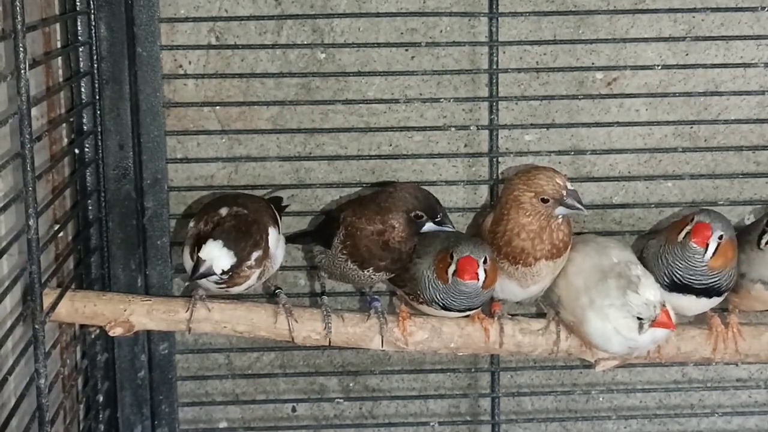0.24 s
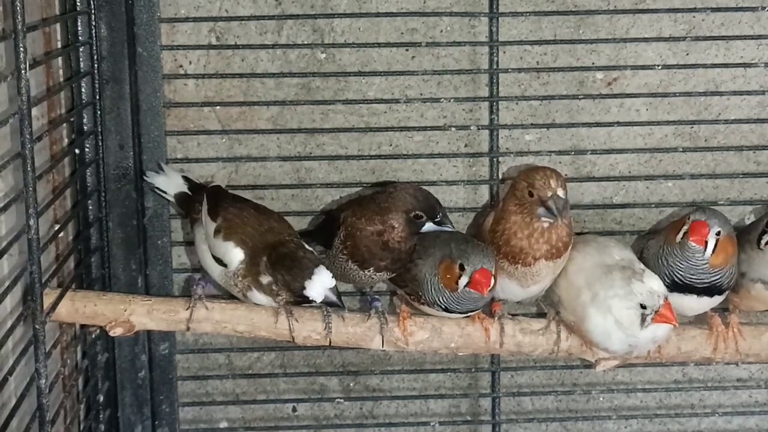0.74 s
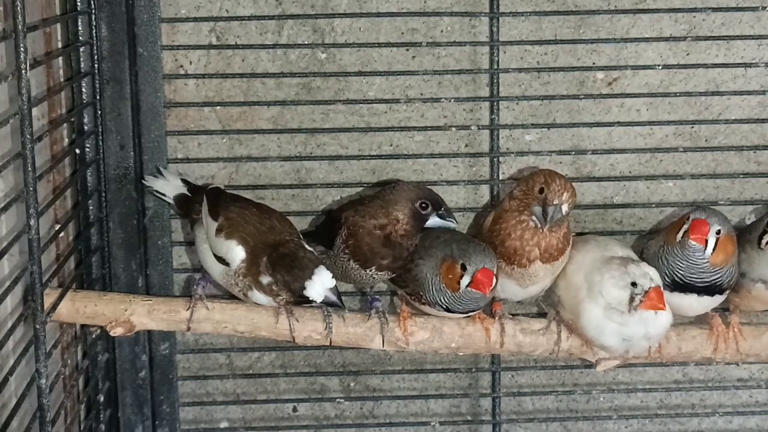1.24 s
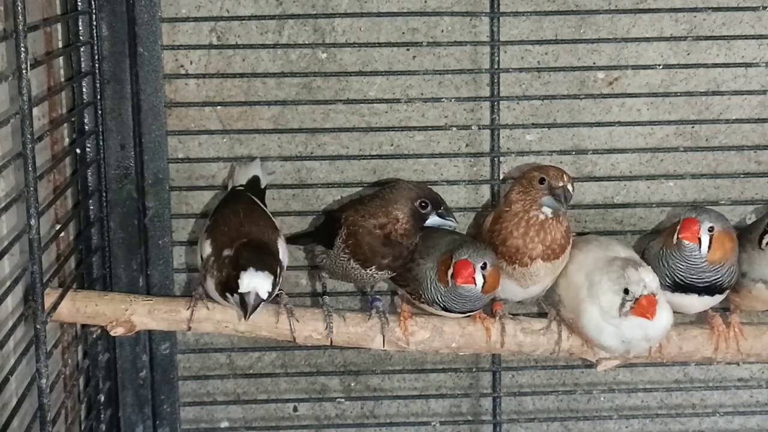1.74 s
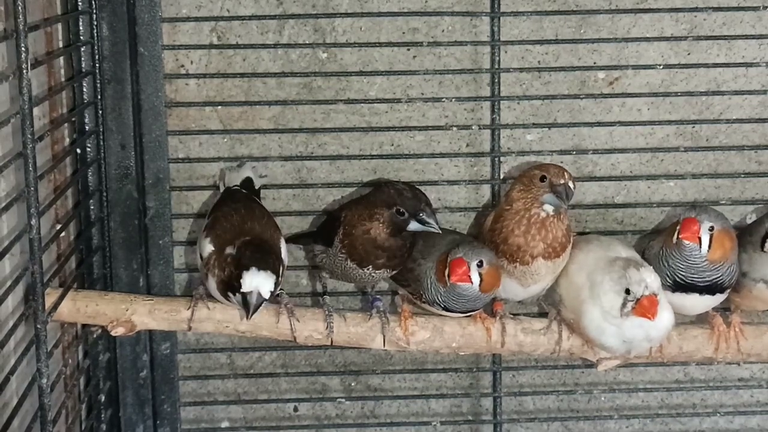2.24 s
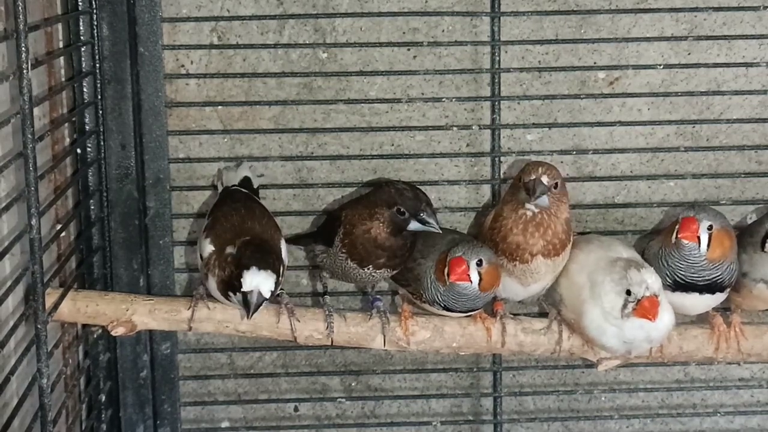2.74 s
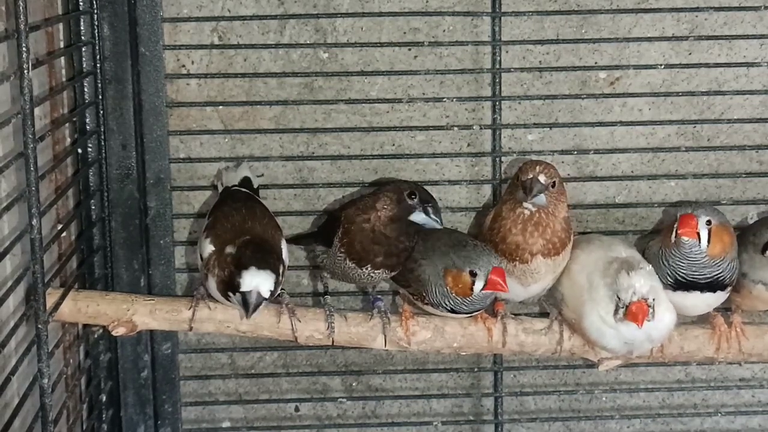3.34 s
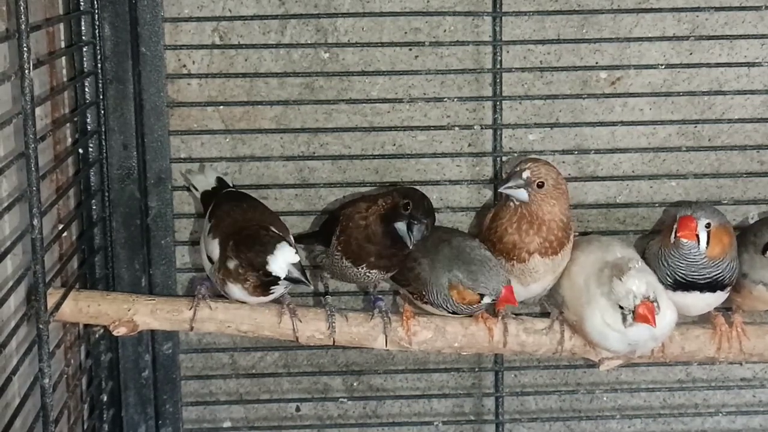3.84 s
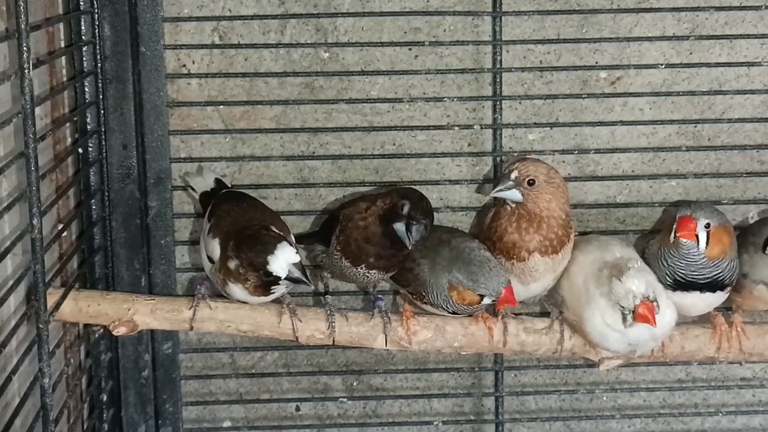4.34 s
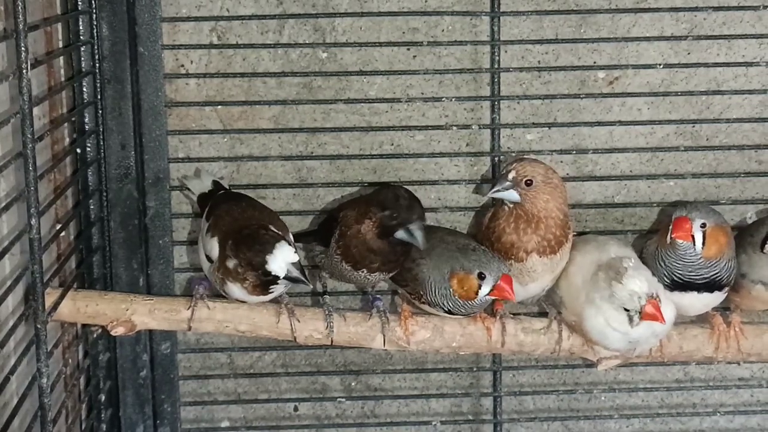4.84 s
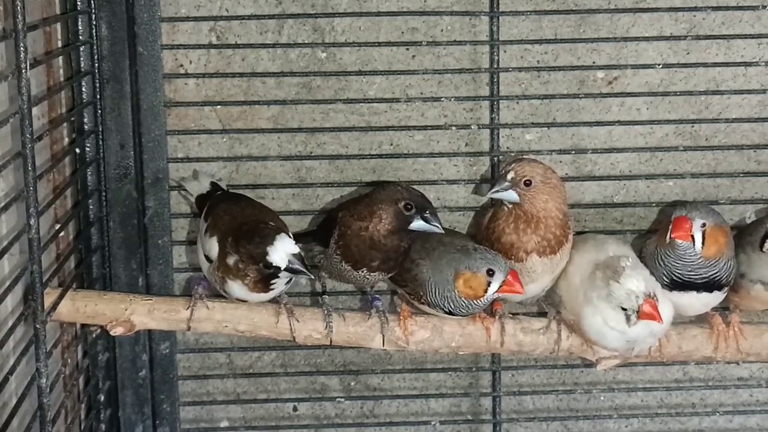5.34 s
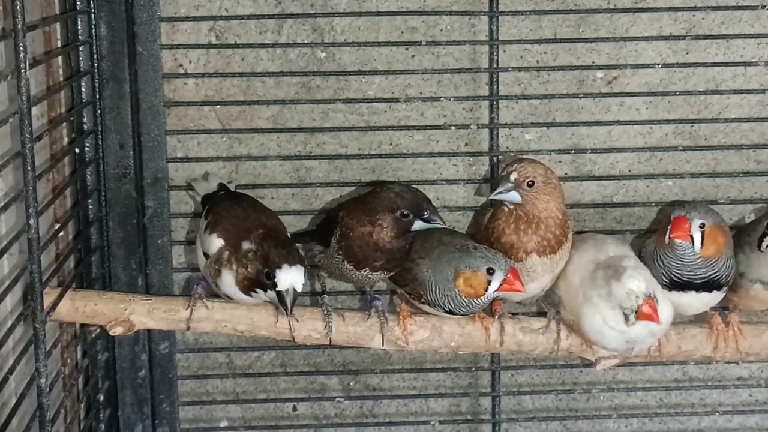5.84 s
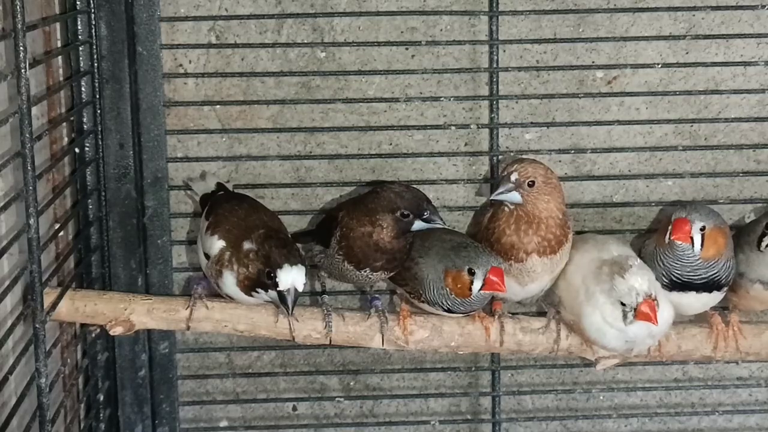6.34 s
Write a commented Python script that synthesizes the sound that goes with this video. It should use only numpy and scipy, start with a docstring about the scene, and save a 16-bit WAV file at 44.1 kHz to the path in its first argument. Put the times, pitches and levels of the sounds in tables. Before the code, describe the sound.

Finches call close by in a wire cage, in a small hard-walled room with a short echo. Three short, arched chirps that sag into a rasp come at about 0.1, 0.3 and 0.7 seconds. Chirps that flip into brief whistles follow at 1.6, 2.2, 2.6, 3.3 and 4.3 seconds, mostly high, the one at 3.3 lower. Raspy chirps return at 4.2 and 5.4 seconds. At 6 seconds comes a very brief, softer hoarse squawk with a rising squeak inside it. Quiet nasal notes answer around 2.1, 4.4, 5.2 and 6 seconds. Beaks and claws tick lightly on the cage near 1.1 seconds and several times from 3.2 to 6.1. The perch gives a soft, dull double bump around 2.9 seconds and a fainter one at 5.1. Thin distant chirps, a faint low hum and a soft hiss continue throughout.

```python
"""Finches sit in a wire cage in a small hard-walled room; a low hum, hiss and far chirps run throughout.
First a near bird's syrinx membrane gives three short arched calls that sag into a rasp. From 1.6 s the
calls flip into whistles, with soft nasal answers, ticks of beaks and claws and bumps on the perch.
The rasping calls return after 4 s, and at 6 s comes a hoarse squawk with a squeak rising inside it."""
import sys
import numpy as np
from scipy import signal
from scipy.fft import rfft, irfft, next_fast_len
from scipy.io import wavfile
from scipy.ndimage import uniform_filter1d, minimum_filter1d

SR = 44100
rng = np.random.default_rng(int(sys.argv[2]) if len(sys.argv) > 2 else 0)


def store_wav(level_fs):
    """Save 16-bit WAV to argv[1]."""
    pcm = np.round(np.clip(np.atleast_2d(level_fs), -1, 1) * 32767)
    wavfile.write(sys.argv[1], SR, pcm.T.astype(np.int16))


N = 290619
CUTOFF_HZ = 16000
RASP_JITTER = .05   # relative pitch spread at full rasp

# calls ending in a rasp: start_s, length_s, top_hz, level_db, tilt_db_per_octave, closing_rasp_share
RASP_CALLS = [(.140, 0.069, 2290, -20, -1, 0.67), (0.275, 0.048, 1967, -19.5, -1.5, 0.2),
              (.673, .070, 2183, -19, -1.5, 1.0), (4.165, .072, 2306, -21, -1, .6),
              (5.444, 0.057, 1809, -20.5, -3, 1.0)]
# calls ending in a whistle: start_s, climb_s, top_hz, level_db, pan_db,
# whistle_s, whistle_start_hz, whistle_end_hz, whistle_db, whistle_rough_share
FLIP_CALLS = [(1.636, .042, 2386, -21, -1, 0.056, 6960, 5950, -22.5, 0),
              (2.225, .047, 2471, -22.5, 0, 0.044, 6850, 6177, -19.5, 0),
              (2.645, 0.039, 2275, -19.5, 1, .030, 6650, 6490, -16, 0.7),
              (3.288, .048, 2539, -21.5, -2, .060, 2435, 2187, -19, .08),
              (4.327, .049, 2396, -19.5, 2.5, 0.029, 5763, 5950, -19, 0.93)]
def near_calls(overlap_s=.004):
    """Birds on the perch: each call sags into a rasp, or cracks at its top and flips into a whistle."""
    out = np.zeros((2, N))
    for start_s, length_s, top_hz, db, tilt_db, rasp in RASP_CALLS:
        call = arch(length_s, top_hz, rasp, sag_share=.8, tilt_db_per_octave=tilt_db)
        add(out, start_s, from_db(db) * call)
    for start_s, climb_s, top_hz, db, pan_db, whistle_s, from_hz, to_hz, whistle_db, rough in FLIP_CALLS:
        ears = from_db([[pan_db / 2], [-pan_db / 2]])
        add(out, start_s, ears * from_db(db) * arch(climb_s, top_hz, closing_rasp=.2))
        flip_s = start_s + climb_s - overlap_s
        add(out, flip_s, ears * from_db(whistle_db) * whistle(whistle_s, from_hz, to_hz, rough))
    return out


# breath spectrum: freq_hz, gain_db
BREATH_EQ = [(300, -31.5), (1200, -20.5), (1600, -8.5), (2200, 5), (2800, -4), (3500, 9), (6200, -7),
             (8500, -13.5), (12000, -2.5), (16000, -26)]
def arch(length_s, top_hz, closing_rasp, sag_share=0, tilt_db_per_octave=0,
         start_hz=1519, rise_share=.54, sag_from=.6, highpass_hz=1480):
    """The pitch leaps up, holds and may sag; the membrane is unsteady as it starts and as it slackens."""
    t = clock(length_s)
    n = len(t)
    climb = np.clip(1 - t / (rise_share * length_s), 0, 1) ** 2
    sag = np.clip((t / length_s - sag_from) / (1 - sag_from), 0, 1)
    rasp = .8 * climb + closing_rasp * np.clip(3 * sag, 0, 1) ** 2
    pitch_hz = top_hz + (start_hz - top_hz) * (climb + sag_share * sag ** 1.4)
    jitter = (.005 + RASP_JITTER * rasp) * wobble(n, 600)
    wander = .01 * wobble(n, 90)
    pitch_hz *= 1 + jitter + wander
    # in a rasp, strong and weak cycles alternate and fill the gaps between harmonics
    doubling = .75 * rasp * np.tanh(wobble(n, 300)) * np.cos(np.pi * np.cumsum(pitch_hz) / SR)
    voice = throat(pitch_hz, tilt_db_per_octave) * (1 + .084 * wobble(n, 350) + doubling)
    breath = (from_db(-33) + from_db(-2.5) * rasp) * noise(n, BREATH_EQ)
    call = (voice + breath) * swell(t, .015, .0065) * from_db(-5.5 * rasp)
    # the tiny throat radiates little below its lowest resonance
    return signal.sosfilt(signal.cheby1(5, .5, highpass_hz, "high", fs=SR, output="sos"), call)


def whistle(length_s, start_hz, end_hz, rough, fray=.6):
    """The other side of the syrinx takes over: a tone that glides, settles and frays as it stops."""
    t = clock(length_s)
    n = len(t)
    rasp = np.minimum(1, rough + fray * (t / length_s) ** 6)
    glide_hz = end_hz + (start_hz - end_hz) * (1 - t / length_s) ** 1.3
    pitch_hz = glide_hz * (1 + RASP_JITTER * rasp * wobble(n, 700))
    breath = from_db(-9) * rasp * noise(n, BREATH_EQ)
    voice = throat(pitch_hz) * (1 + .05 * wobble(n, 350))
    return swell(t, .004, .032) * (voice + breath)


# throat and beak response: freq_hz, gain_db
THROAT_EQ = [(1500, -3), (1900, -0.5), (2400, -2), (3200, 2.5), (4000, -4.5), (4900, 4), (5700, 2),
             (6700, 2.5), (7700, -4.5), (9500, -11.5), (11300, -4.5), (13500, -12.5), (16000, -21.5)]
def throat(pitch_hz, tilt_db_per_octave=0):
    """Each harmonic swells and fades as it glides through the resonances of throat and beak."""
    levels_db = [at_hz(THROAT_EQ, k * pitch_hz) + tilt_db_per_octave * np.log2(k) for k in range(1, 10)]
    return harmonics(pitch_hz, levels_db)


# soft answers: start_s, length_s, pitch_hz, level_db, rough_share
NASAL_NOTES = [(2.079, .11, 614.3, -46, 0.13), (4.401, 0.098, 644, -53, 0.42),
               (5.178, 0.101, 580, -49.5, 0.47), (5.961, 0.083, 521, -48.5, 0.35)]
# nasal throat response: freq_hz, gain_db
NASAL_EQ = [(550, -9.5), (1200, -6), (1800, -4.5), (3100, -3), (4900, -11.5), (6200, -31.5), (9000, -43),
            (16000, -59.5)]
def nasal_notes(bow=.04, fall=.03, jitter=.045):
    """Low, gently arched notes with a full stack of harmonics."""
    out = np.zeros(N)
    for start_s, length_s, hz, db, rough in NASAL_NOTES:
        t = clock(length_s)
        along = 2 * t / length_s - 1
        pitch_hz = hz * (1 - bow * along ** 2 - fall * along / 2 + jitter * rough * wobble(len(t), 230))
        voice = harmonics(pitch_hz, at_hz(NASAL_EQ, hz * np.arange(1, 20)))
        flutter = 1 + rough * wobble(len(t), 100)
        add(out, start_s, from_db(db) * swell(t, .011, .034) * rms_one(voice * flutter))
    return out


# taps on the wire: start_s, level_db
CAGE_TICKS = [(1.066, -44), (3.204, -44.5), (3.614, -45.5), (5.013, -41), (5.098, -44), (5.668, -43.5),
              (6.089, -50)]
# tick spectrum: freq_hz, gain_db
TICK_EQ = [(500, -14.5), (1200, 5), (3000, 8.5), (6000, -3.5), (9000, -3.5), (13000, 4.5), (16000, -7.5)]
def cage_ticks(gain_db=-9, t60_s=.04):
    """Beaks and claws strike the cage: dry bursts of noise."""
    out, t = np.zeros(N), clock(.1984)
    for start_s, db in CAGE_TICKS:
        add(out, start_s, from_db(db + gain_db - 60 * t / t60_s) * noise(len(t), TICK_EQ))
    return out


# knocks on the perch: start_s, pitch_hz, level_db, t60_s
PERCH_BUMPS = [(2.889, 218, -39.5, 0.12), (2.948, 205, -37.5, 0.081), (5.144, 428, -52, .08)]
def perch_bumps():
    """The bumped perch rings dully in one damped mode."""
    out, t = np.zeros(N), clock(.1984)
    for start_s, hz, db, t60_s in PERCH_BUMPS:
        envelope = from_db(db - 60 * t / t60_s) * swell(t, .004, .013)
        add(out, start_s, envelope * np.sin(2 * np.pi * hz * t))
    return out


# harsh call: start_s, length_s, pitch_hz, level_db
SQUAWK_CALLS = [(5.990, .030, 530, -31)]
# squawk spectrum: freq_hz, gain_db
SQUAWK_EQ = [(300, -30), (500, -16), (1100, -8.5), (2200, -5), (3600, -0.5), (4700, -2.5), (5800, -11),
             (7000, -12), (8500, -20.5), (15500, -16)]
def squawk(jitter=.027, breath_db=-3):
    """Unsteady harmonics and breath of the same colour make a hoarse cry."""
    out = np.zeros(N)
    for start_s, length_s, hz, db in SQUAWK_CALLS:
        t = clock(length_s)
        pitch_hz = hz * (1 + jitter * wobble(len(t), 280))
        voice = rms_one(harmonics(pitch_hz, at_hz(SQUAWK_EQ, hz * np.arange(1, 20))))
        breath = from_db(breath_db) * noise(len(t), SQUAWK_EQ)
        add(out, start_s, from_db(db) * swell(t, .0053, .01) * rms_one(voice + breath))
    return out


# tone inside the squawk: start_s, length_s, start_hz, end_hz, level_db
SQUEAK_GLIDES = [(6.0, .017, 3550, 4050, -32)]
def squeak():
    """A brief, pure upward glide."""
    out = np.zeros(N)
    for start_s, length_s, start_hz, end_hz, db in SQUEAK_GLIDES:
        t = clock(length_s)
        pitch_hz = np.linspace(start_hz, end_hz, len(t))
        add(out, start_s, swell(t, .0041, .014) * harmonics(pitch_hz, [db]))
    return out


# clearest far chirps: start_s, start_hz, level_db
CLEAR_CHIRPS = [(.91, 3750, -60.5), (1.52, 3800, -62), (2.52, 3580, -59.5), (4.58, 3906, -64.5),
                (4.70, 3740, -57.5), (5.42, 5550, -56), (5.79, 3610, -60.5), (5.83, 5490, -63.5),
                (6.335, 5320, -66.5)]
def far_chirps(length_s=.06, fall=.16, jitter=.04, faint_per_s=3, faint_hz=3850, faint_db=-66):
    """Thin, scratchy falling glides from birds further off; fainter ones come at random."""
    out, t = np.zeros(N), clock(length_s)
    count = int(faint_per_s * N / SR)
    draws = rng.uniform([0, -.35, -2.5], [N / SR, .35, 2.5], (count, 3))
    faint = [(start_s, faint_hz * 2 ** octaves, faint_db + db) for start_s, octaves, db in draws]
    for start_s, start_hz, db in list(CLEAR_CHIRPS) + faint:
        pitch_hz = start_hz * (1 - fall * t / length_s) * (1 + jitter * wobble(len(t), 600))
        flutter = rms_one(1 + .5 * wobble(len(t), 200))
        add(out, start_s, swell(t, .0082, .018) * flutter * harmonics(pitch_hz, [db]))
    return out


# room decay: freq_hz, t60_s
WALL_DECAY = [(200, .3), (2000, .25), (5000, .235), (7000, .24), (11000, .195), (16000, .175)]
def room(x, direct_db, wet_db, first_echo_s=.0012):
    """Close walls return a dense tail, different at each ear, whose treble dies first."""
    t = clock(.45)
    hz = np.fft.rfftfreq(len(t), 1 / SR)
    white = rfft(rng.standard_normal((2, len(t))))
    edges_hz = np.r_[0, np.linspace(1000, CUTOFF_HZ, 10)]
    tail = np.zeros((2, len(t)))
    for lo, hi in zip(edges_hz, edges_hz[1:]):
        band = irfft(white * (hz >= lo) * (hz < hi), len(t))
        tail += band * from_db(-60 * t / at_hz(WALL_DECAY, (lo + hi) / 2))
    tail *= t > first_echo_s
    tail /= np.sqrt(np.sum(tail ** 2, axis=1, keepdims=True))
    stereo = x * np.ones((2, 1))
    wet = signal.oaconvolve(stereo, tail, axes=1)[:, :N]
    return from_db(direct_db) * stereo + from_db(wet_db) * wet


# port balance: freq_hz, left_minus_right_db
PORT_LEAN = [(1500, -1), (2300, -2), (4000, -3), (5000, -6), (6600, -7), (9000, -7), (10500, 5.5),
             (11300, 10.5), (13500, 3.5), (16000, 0.5)]
def ports(x):
    """The two microphone ports favour different bands of the near birds."""
    hz, lean_db = np.transpose(PORT_LEAN)
    power_db = 10 * np.log10(np.cosh(lean_db * np.log(10) / 20))
    left = coloured(x[0], np.c_[hz, lean_db / 2 - power_db])
    right = coloured(x[1], np.c_[hz, -lean_db / 2 - power_db])
    return np.array([left, right])


# hum spectrum: freq_hz, gain_db
HUM_EQ = [(20, -38), (30, -23.5), (50, -11.5), (70, -2), (92, 1.5), (140, -7), (230, -9.5), (350, -13.5),
          (500, -16.5), (640, -21), (800, -26.5), (1500, -30), (2500, -65.5)]
# hum envelope: time_s, level_db
HUM_ENVELOPE = [(0.0, -60), (4.97, -60), (5.91, -57), (6.59, -58)]
def hum(gain_db=2.5, waver_db=1.5):
    """Low noise with a wavering level."""
    return from_db(gain_db + in_time(HUM_ENVELOPE) + waver_db * wobble(N, 11)) * room_noise(HUM_EQ)


# hiss spectrum: freq_hz, gain_db
HISS_EQ = [(400, -24.5), (700, -3.5), (1200, -5.5), (2000, -1.5), (3400, -4), (4300, -12), (5500, -9.5),
           (9000, -19.5), (13000, -16.5), (16000, -23)]
# hiss envelope: time_s, level_db
HISS_ENVELOPE = [(0, -65.5), (1.4, -59), (3.1, -62), (3.9, -66), (4.8, -60.5), (6.3, -68.5)]
def hiss():
    """Faint broad noise that slowly swells and fades."""
    return from_db(in_time(HISS_ENVELOPE)) * room_noise(HISS_EQ)


# likeness of the two ears: freq_hz, correlation
EAR_CORRELATION = [(40, 1), (90, 0.72), (180, 0.88), (350, 0.15), (700, 0.41), (3000, 0.038),
                   (16000, 0.072)]
def room_noise(spectrum):
    """Diffuse noise, alike at both ears only in the bass."""
    size = next_fast_len(N)
    hz = np.fft.rfftfreq(size, 1 / SR)
    alike = at_hz(EAR_CORRELATION, hz)
    mid, side = rfft(rng.standard_normal((2, size))) * from_db(at_hz(spectrum, hz))
    ears = np.sqrt(1 + alike) * mid + np.sqrt(1 - alike) * side * [[1], [-1]]
    return rms_one(irfft(ears, size)[:, :N])


def harmonics(pitch_hz, levels_db):
    """A vibrating membrane: sines on multiples of the pitch."""
    phase = 2 * np.pi * np.cumsum(pitch_hz) / SR
    partials = (from_db(db) * np.sin(k * phase + rng.uniform(0, 2 * np.pi)) * (k * pitch_hz < SR / 2)
                for k, db in enumerate(levels_db, 1))
    return np.sqrt(2) * sum(partials)


def swell(t, attack_s, release_s):
    """An envelope that builds, holds and drops."""
    rise = np.sin(np.pi / 2 * np.clip(t / attack_s, 0, 1)) ** 2
    fall = np.sin(np.pi / 2 * np.clip((t[-1] - t) / release_s, 0, 1)) ** 2
    return rise * fall


def wobble(n, rate_hz):
    """Smooth random motion, rms 1."""
    pole, run_in = np.exp(-2 * np.pi * rate_hz / SR), int(SR / rate_hz)
    smooth = signal.lfilter([1], [1, -2 * pole, pole * pole], rng.standard_normal(n + run_in))
    return rms_one(smooth[run_in:])


def coloured(x, spectrum):
    """Filters by a freq_hz, gain_db table."""
    n = x.shape[-1]
    size = next_fast_len(n)
    gain = from_db(at_hz(spectrum, np.fft.rfftfreq(size, 1 / SR)))
    return irfft(rfft(x, size) * gain, size)[..., :n]


def noise(n, spectrum):
    return rms_one(coloured(rng.standard_normal(n), spectrum))


def at_hz(rows, hz):
    """Reads a table on a log-frequency axis."""
    freq_hz, value = np.transpose(rows)
    return np.interp(np.log(np.maximum(hz, 1)), np.log(freq_hz), value)


def in_time(rows):
    return np.interp(np.arange(N) / SR, *np.transpose(rows))


def from_db(db):
    return 10 ** (np.asarray(db) / 20)


def rms_one(x):
    return x / np.sqrt(np.mean(x ** 2) + 1e-20)


def clock(length_s):
    return np.arange(int(length_s * SR)) / SR


def add(out, start_s, sound):
    i = max(int(start_s * SR), 0)
    out[..., i:i + sound.shape[-1]] += sound[..., :N - i]


def scene():
    """Near birds, cage sounds and far birds in the room, over hum and hiss."""
    near = ports(room(near_calls(), direct_db=-1.5, wet_db=-1.5))
    small_sounds = nasal_notes() + cage_ticks() + perch_bumps() + squawk() + squeak()
    cage = room(small_sounds, direct_db=.5, wet_db=-4.5)
    far = room(far_chirps(), direct_db=-2.5, wet_db=-6)
    return near + cage + far + hum() + hiss()


def record(dry):
    """A look-ahead limiter holds peaks under full scale; the top is cut steeply."""
    ceiling, window = .8, SR // 100
    allowed = np.minimum(1, ceiling / (np.abs(dry).max(axis=0) + 1e-9))
    gain = uniform_filter1d(minimum_filter1d(allowed, window), window)
    return signal.sosfilt(signal.ellip(10, .2, 70, CUTOFF_HZ, fs=SR, output="sos"), dry * gain)


dry = scene()
out = record(dry)
store_wav(out)
```